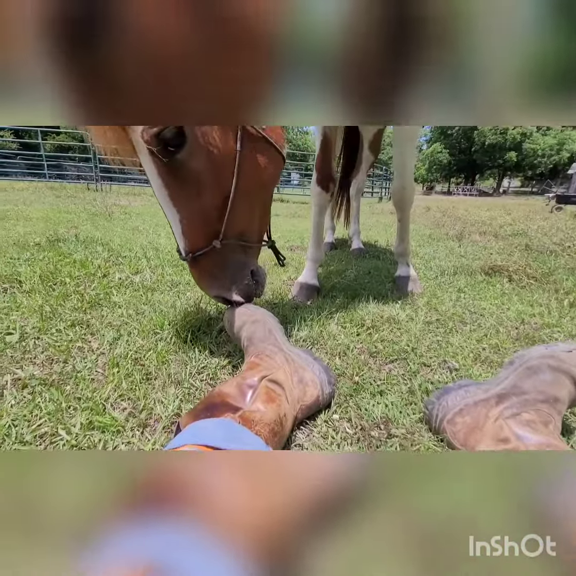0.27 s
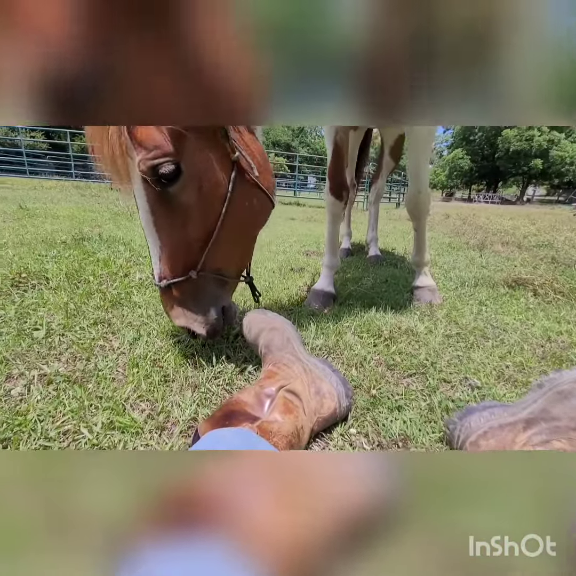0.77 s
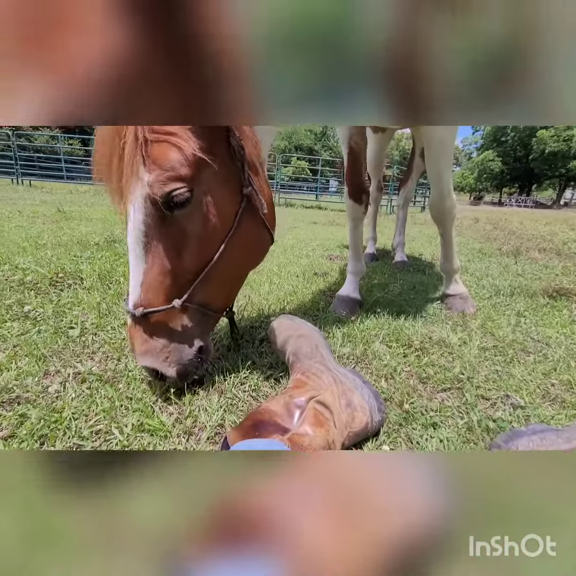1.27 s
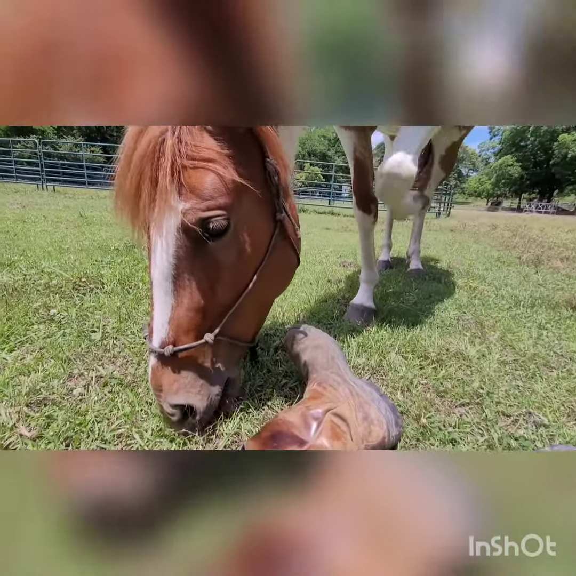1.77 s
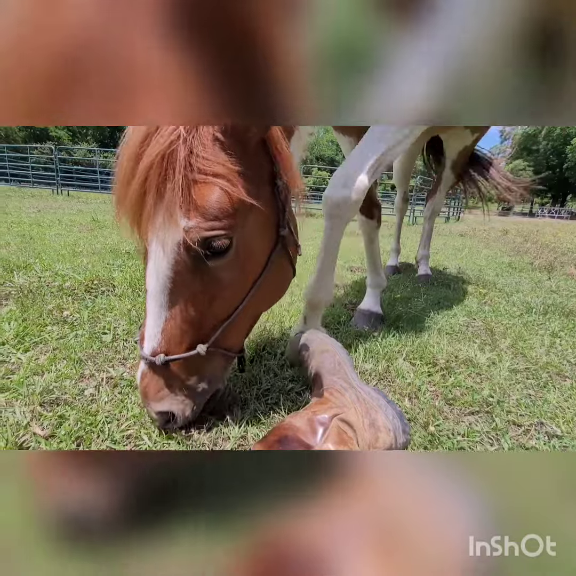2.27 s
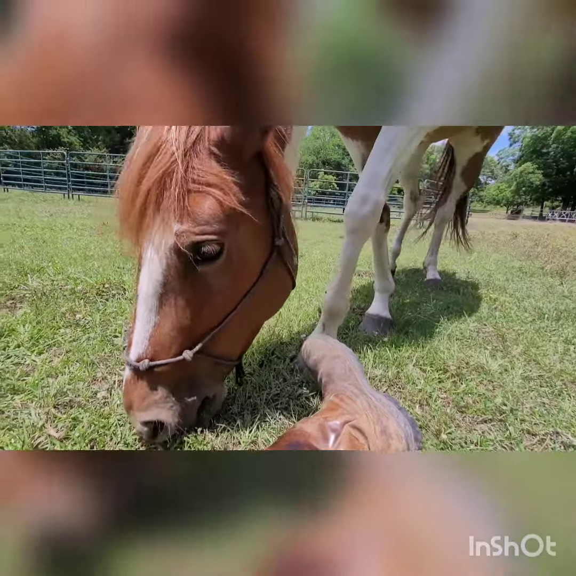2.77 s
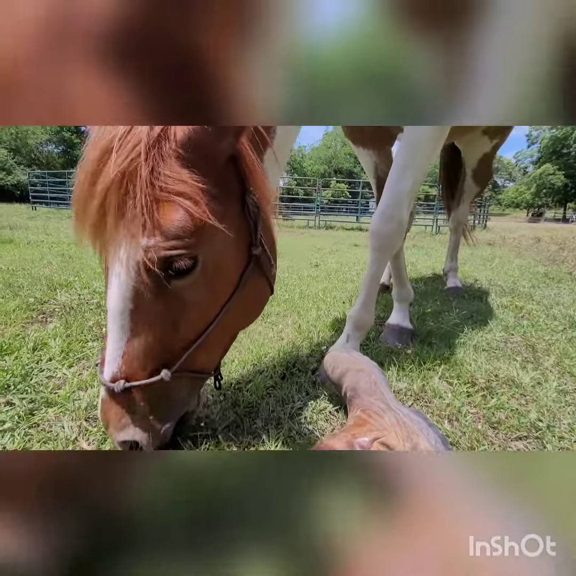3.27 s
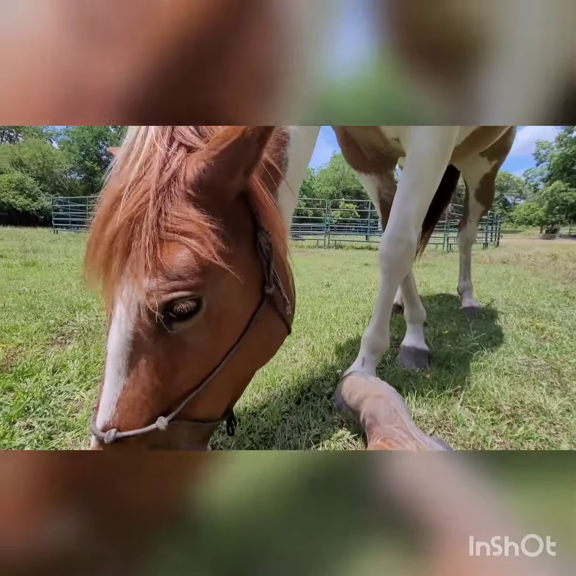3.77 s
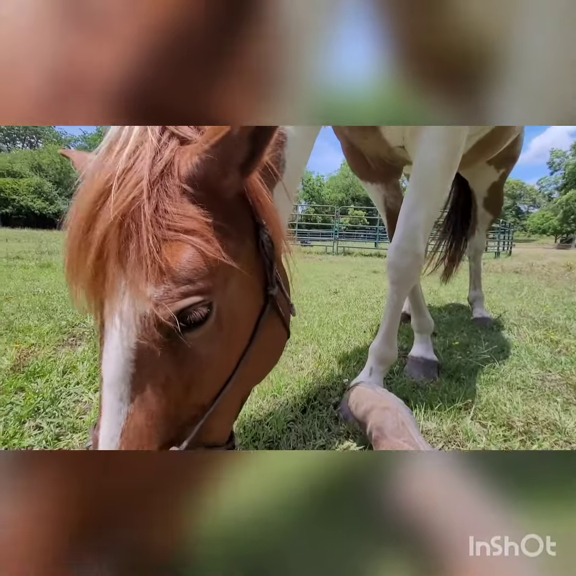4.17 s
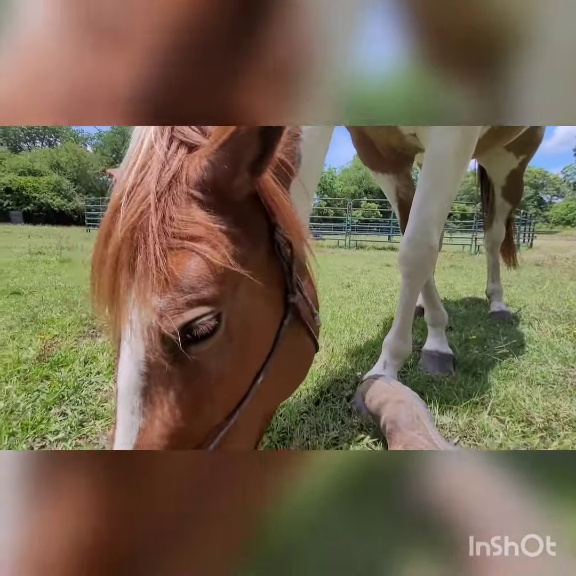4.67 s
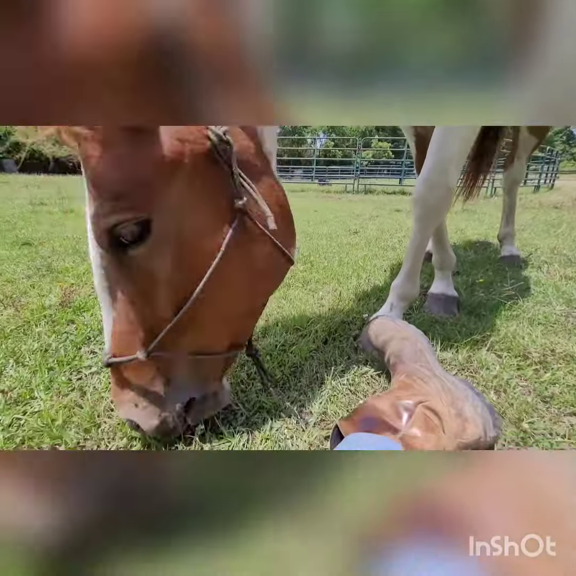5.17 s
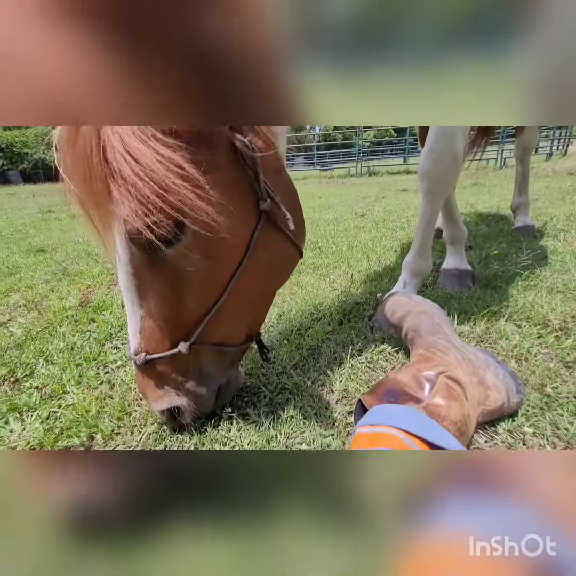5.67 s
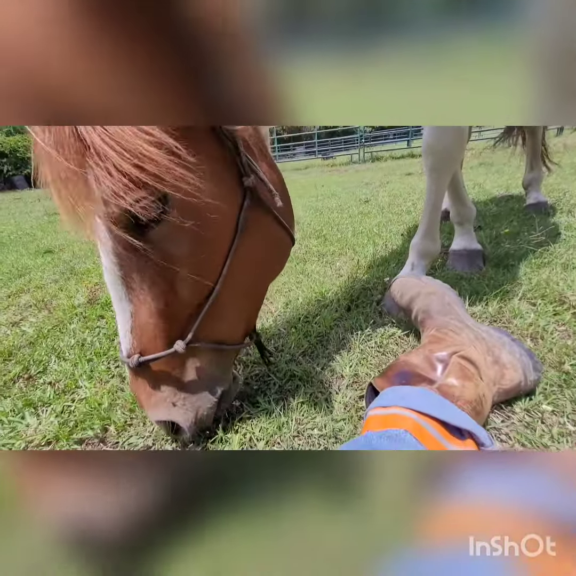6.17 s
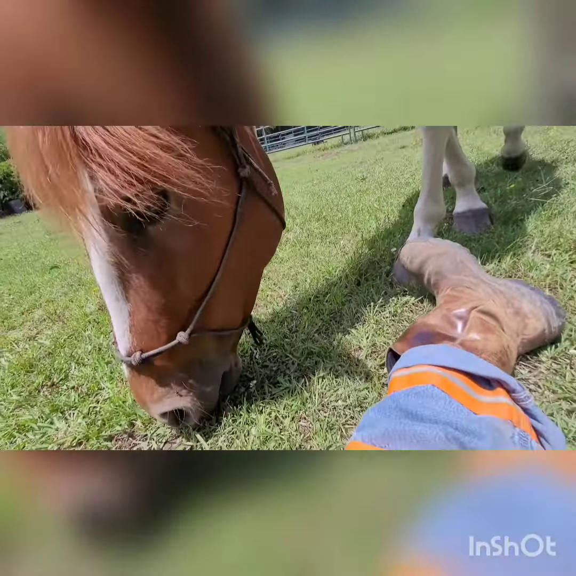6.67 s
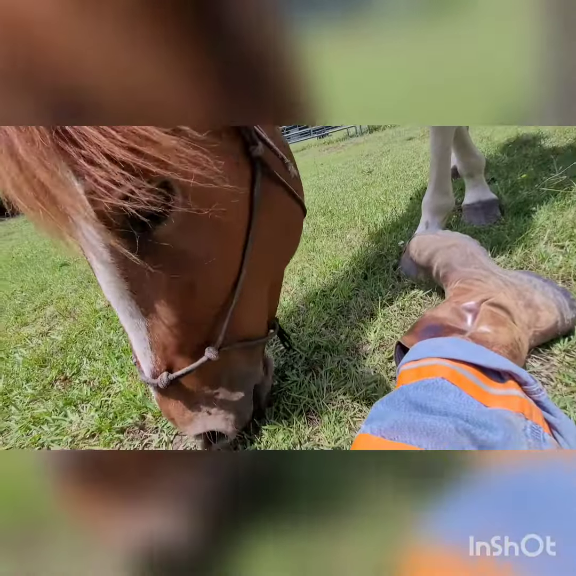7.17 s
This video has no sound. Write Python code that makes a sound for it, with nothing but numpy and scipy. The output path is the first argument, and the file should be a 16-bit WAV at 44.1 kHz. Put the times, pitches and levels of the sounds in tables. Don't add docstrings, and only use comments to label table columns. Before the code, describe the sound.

A stereo microphone lies in open grass beside a horse's mouth. A distant machine hums near 200 Hz throughout, in slow overlapping swells strongest in the first two seconds, with low lumpy wind and faint leaf and insect hiss. At 0.4 s comes a soft nostril sniff and two quick upward chirps; another short sniff at 1.3. Light brushing and chewing begin, with dull tooth knocks from 1.6. At 2.1-2.3 grass rips sharply and a hoof lands with a deep thud. A longer crackling pull comes at 3.0, then a quiet gap, a sniff at 3.7 and gentle chewing. Crunchy tears follow at 4.05 and 4.75, then a soft rip at 5.3 with wet pops. A loud crunch with lip squeaks hits at 6.0, bird chirps at 6.2, more chewing, and a bright, full rip at 6.9 before wet munching to the end near 7.4.

```python
import sys
import numpy as np
from scipy import signal
from scipy.fft import rfft, irfft
from scipy.io import wavfile
from scipy.ndimage import uniform_filter1d

SR = 44100
rng = np.random.default_rng(int(sys.argv[2]) if len(sys.argv) > 2 else 0)


def field_ratio(decibels):
    return 10 ** (np.asarray(decibels, dtype=float) / 20)


def generate_wav(signal):
    frames = np.transpose(np.atleast_2d(signal))
    scaled = np.clip(frames, -1, 1) * 32767
    pcm = np.round(scaled).astype(np.int16)
    wavfile.write(sys.argv[1], SR, pcm)


N = 327699


def evened(x):
    return x / np.sqrt(np.mean(x ** 2) + 1e-20)


def read(points, hz):
    f, value = np.transpose(points)
    return np.interp(np.log(hz + 1), np.log(f + 1), value)


def curve(rows, order):
    columns = np.transpose(rows)
    return np.interp(np.arange(N) / SR, columns[0], columns[order])


def add(mix, s, sound):
    part = mix[..., round(s * SR):][..., :sound.shape[-1]]
    part += sound[..., :part.shape[-1]]


# f/Hz, likeness (0 to 1)
LIKENESS = [(60, .88), (180, .93), (550, .85), (1650, .6), (5000, .1), (15000, .02)]


def heard(two, colour, size=512, patchy_db=0, wide=1):
    hz, _, (a, b) = signal.stft(two, SR, nperseg=size)
    same = np.clip(read(LIKENESS, hz), 0, 1)[:, None] ** wide
    ports = np.array([a, same * a + np.sqrt(1 - same ** 2) * b])
    patches = rng.standard_normal(a.shape)
    patches = uniform_filter1d(patches, size=size // 50, axis=0)
    patches = uniform_filter1d(patches, size=3000 // size + 1, axis=1)
    ports *= field_ratio(read(colour, hz)[:, None] + patchy_db * evened(patches))
    return evened(signal.istft(ports, SR, nperseg=size)[1][:, :N])


def grains(per_s, spread_db, bed):
    size = field_ratio(spread_db * np.minimum(rng.exponential(1, N), 4))
    size = size * (rng.random(N) < per_s / SR)
    fade_s = .0005
    size = signal.lfilter([1], [1, -np.exp(-1 / (fade_s * SR))], size)
    return (evened(size) + bed) * rng.standard_normal((2, N))


def flutter(hz, depth_db):
    drift = signal.sosfilt(signal.butter(2, hz, fs=SR, output="sos"), rng.standard_normal(N))
    return field_ratio(depth_db * evened(drift))


def ring(hz, t60, rise):
    t = np.arange(round(t60 * SR) + 40) / SR
    swing = -np.sin(2 * np.pi * hz * t) * field_ratio(-60 * t / t60) * (1 - np.exp(-t / rise))
    return swing / abs(swing).max()


def whistles(rows, rough):
    out = np.zeros(N)
    for s, length, from_hz, to_hz, db in rows:
        u = np.linspace(0, 1, round(length * SR))
        hz = to_hz + (from_hz - to_hz) * (1 - u) ** 2
        tone = np.sin(2 * np.pi * np.cumsum(hz) / SR)
        add(out, s, field_ratio(db) * tone * np.sin(np.pi * u))
    shiver = evened(uniform_filter1d(rng.standard_normal(N), size=70))
    return out * (1 + rough * shiver)


# t/s, level/dB
WIND = [(0.0, -67.5), (0.68, -61.5), (1.01, -66), (1.26, -65.5), (1.51, -62.5), (2.19, -61.5), (2.69, -67),
        (2.98, -62), (3.1, -66.5), (3.35, -66), (3.95, -62.5), (4.14, -66), (4.39, -67), (5.34, -63),
        (5.79, -69.5), (6.6, -66.5), (7.06, -62.5), (7.43, -60)]
# f/Hz, level/dB (per Hz)
GUST = [(20, -34), (35, -4.5), (55, 0), (90, -4), (170, -2), (260, -6), (420, -25), (700, -38.5)]
# f/Hz, level/dB (per Hz)
AIR = [(180, -12), (300, -8), (349, -5), (558, -9.5), (970, -18), (1330, -24.5), (1960, -13.5),
       (2980, -29.5), (3770, -11), (6670, -13.5), (8580, -19.5), (9650, -26), (10500, -25), (15200, -32),
       (16500, -11.5)]


def outdoors():
    wind = heard(rng.standard_normal((2, N)), GUST, size=4096, wide=3) * flutter(hz=9.2, depth_db=2.5)
    air = heard(rng.standard_normal((2, N)), AIR, size=1024, patchy_db=.7) * flutter(hz=2, depth_db=.5)
    return wind * field_ratio(curve(WIND, order=1) + 5.0) + air * field_ratio(-70.5)


# t/s of the peak, length/s, level/dB
SWELLS = [(0.04, 0.69, -51.5), (0.568, 0.7, -45.5), (0.987, 1, -53), (1.329, 0.41, -46.5), (1.702, 1, -48),
          (2.32, 0.91, -55.5), (2.66, 0.67, -52.5), (3.025, 0.43, -54.5), (3.4, 0.43, -51),
          (3.805, 0.59, -50.5), (4.52, 0.77, -54), (5.19, 0.99, -58.5), (5.483, 0.82, -52.5),
          (6.127, 0.57, -55.5), (6.67, 0.98, -52.5), (7.256, 0.87, -55)]


def swells():
    t, power = np.arange(N) / SR, field_ratio(-82) ** 2
    for s, length, db in SWELLS:
        hump = np.cos(np.pi * np.clip((t - s) / length, -.5, .5)) ** 2
        power = power + (field_ratio(db) * hump) ** 2
    return np.sqrt(power)


# t/s, f/Hz
HUM_HZ = [(0, 203), (2, 203.7), (3, 198.9), (4.5, 195), (6, 198.8), (7.43, 195.6)]


def hum():
    turns = 2 * np.pi * np.cumsum(curve(HUM_HZ, order=1)) / SR
    tone = np.sqrt(2) * (np.sin(turns) + field_ratio(-29.5) * np.sin(2 * turns))
    return tone * swells() * flutter(hz=22, depth_db=-0.13)


# t/s, length/s, start f/Hz, end f/Hz, level/dB
CHIRPS = [
    (.372, .03, 4880, 7250, -64),
    (.528, 0.03, 4900, 7220, -60),
    (.84, 0.1, 7600, 8400, -77),
    (.96, .07, 2400, 2000, -78),
    (1., .1, 8100, 8600, -79),
    (6.225, 0.042, 6500, 7860, -59),
    (6.31, 0.042, 5830, 7740, -61),
]


def bird():
    direct, t = whistles(CHIRPS, rough=1), np.arange(SR // 3) / SR
    echoes = rng.standard_normal((2, len(t))) * field_ratio(-60 * t / .4)
    echoes = echoes / np.linalg.norm(echoes[0])
    return direct / 2 + signal.fftconvolve(direct[None], echoes, axes=1)[:, :N]


# t/s, level/dB (peak), f/Hz, t60/s
THUDS = [
    (0.171, -49.5, 57, 0.23),
    (0.74, -46.5, 54, 0.19),
    (1.293, -45, 51, 0.43),
    (1.974, -40, 43, 0.14),
    (2.279, -21.5, 68, 0.077),
    (3.099, -51, 60.4, .12),
    (3.57, -51, 55, 0.14),
    (4.82, -53, 60, 0.1),
    (6.02, -45.5, 55, .14),
    (7.147, -44.5, 58, 0.2),
]


def hooves():
    turf = np.zeros((2, N))
    sides_db = rng.choice([-.3, .3], len(THUDS))
    for (s, db, hz, t60), side_db in zip(THUDS, sides_db):
        add(turf, s, field_ratio([[db - side_db], [db + side_db]]) * ring(hz, max(t60, .02), rise=0.0017))
    return turf


# t/s, length/s, level/dB
SNIFFS = [
    (0.401, 0.45, -55.5),
    (1.27, 0.19, -57),
    (3.713, 0.33, -56.5),
]
# f/Hz, level/dB (per Hz)
NOSTRIL = [(140, -53), (230, 1.5), (579, -9), (783, -11.5), (1160, -21), (1740, -21), (3600, -27),
           (6820, -28.5), (8450, -34.5), (16000, -25)]


def sniffs():
    level = np.zeros(N)
    for s, length, db in SNIFFS:
        add(level, s, field_ratio(db) * np.hanning(round(length * SR)) ** 0.92)
    breath = heard(rng.standard_normal((2, N)), NOSTRIL, patchy_db=-2.5)
    return level * flutter(hz=40, depth_db=1.0) * breath


# t/s, level/dB (peak), f/Hz of the jaw, level/dB of the cheek
KNOCKS = [(1.595, -43, 205, -47.5), (1.719, -55, 197, -59), (1.83, -39, 149, -56),
          (1.91, -38.5, 225, -40.5), (2.073, -41.5, 178, -56), (2.276, -31, 142, -53),
          (2.599, -38.5, 234, -40.5), (2.914, -42, 177, -63), (3.681, -40.5, 201, -43),
          (3.761, -37, 207, -56), (3.907, -40, 205, -67), (3.979, -38.5, 140, -65), (4.178, -40, 129, -71),
          (4.426, -38.5, 196, -65), (4.495, -38.5, 230, -38.5), (4.719, -40.5, 130, -73),
          (5.043, -39, 153, -56), (5.192, -41.5, 149, -62), (5.208, -45, 150, -66),
          (5.668, -42.5, 280, -45.5), (5.733, -42, 250, -46), (5.949, -36, 170, -56),
          (6.033, -30, 339, -42), (6.077, -29.5, 316, -37), (6.613, -39, 214, -46), (6.854, -31, 197, -60),
          (6.943, -36, 247, -43), (7.334, -31, 277, -38)]


def knocks():
    jaw, lag_s = np.zeros(N), .003
    for s, db, hz, cheek_db in KNOCKS:
        add(jaw, s + lag_s, field_ratio(db) * ring(hz, t60=6.8 / hz, rise=0.0012))
        add(jaw, s + lag_s, field_ratio(cheek_db - 4.5) * ring(hz=610, t60=0.03, rise=0.0015))
    return jaw


# t/s, length/s, start f/Hz, end f/Hz, level/dB
SQUEAKS = [
    (1.72, 0.025, 2230, 1970, -65),
    (5.13, 0.019, 1270, 735, -53.5),
    (5.535, 0.021, 810, 1020, -57),
    (6.095, 0.023, 2630, 2070, -51),
    (6.11, .012, 2000, 2860, -49.5),
    (1.815, .035, 2250, 2190, -66),
    (1.88, 0.046, 2740, 2650, -69),
    (7.172, 0.0205, 1070, 1860, -57),
    (7.258, 0.021, 1760, 698, -54.5),
]


def squeaks():
    return whistles(SQUEAKS, rough=0.76)


# t/s, level/dB, f/Hz
POPS = [(5.0908, -50.5, 1100), (5.431, -43, 1200), (5.432, -47, 2170), (5.554, -44, 1140),
        (5.785, -43, 980), (5.795, -46, 1110), (5.523, -56, 3200), (6.321, -56, 1110), (6.332, -59, 2600),
        (6.446, -56, 1060), (6.478, -52.5, 950), (6.604, -51, 1170), (6.616, -52, 1190), (6.856, -53, 1700),
        (7.087, -60, 2700), (7.171, -46, 1010), (7.259, -49, 1580), (7.271, -52, 1010), (7.366, -49, 900),
        (7.375, -44, 880), (2.796, -57, 1170), (3.133, -58, 1350)]


def pops():
    out = np.zeros(N)
    for s, db, hz in POPS:
        add(out, s, field_ratio(db) * ring(hz, t60=.012, rise=.0008))
    return out


# t/s, level/dB of brushing
NUZZLE = [
    (1.1, -83.5),
    (1.45, -67),
    (2.9, -63),
    (3.2, -71.5),
    (3.6, -66),
    (5.0, -63.5),
    (5.75, -63.5),
    (6.15, -62),
    (6.55, -62),
    (7.43, -62),
]
# t/s, time to lose 15 dB/s, level/dB of brushing, level/dB of grinding
JERKS = [
    (2.165, 0.03, -57, -47),
    (2.273, 0.0356, -43, -51),
    (2.996, 0.17, -60.5, -54),
    (4.05, 0.18, -54.5, -53.5),
    (4.787, 0.22, -53.5, -50.5),
    (5.953, 0.1, -59, -56),
    (6.037, 0.17, -53.5, -52.5),
    (6.922, 0.3, -61, -56),
    (6.954, -0.01, -56.5, -47),
]
# t/s, length/s, level/dB of brushing, level/dB of grinding
CHEWS = [(1.319, 0.14, -69, -59.5), (1.549, 0.074, -55, -70), (1.692, 0.089, -62, -70),
         (1.794, 0.088, -53.5, -62), (1.908, 0.22, -61, -62.5), (2.181, 0.15, -53, -58),
         (2.39, 0.18, -61.5, -74), (2.545, 0.12, -56.5, -61.5), (2.706, 0.13, -65, -62.5),
         (3.623, 0.12, -57, -60.5), (3.767, 0.2, -68, -54.5), (3.93, 0.092, -57.5, -57),
         (4.106, .11, -56, -80), (4.383, 0.098, -57, -58.5), (4.498, 0.083, -62.5, -58.5),
         (5.093, 0.12, -60, -63), (5.4, 0.1, -56, -62), (5.507, .1, -57.5, -60), (5.625, 0.077, -46.5, -56),
         (5.76, 0.099, -59.5, -61), (5.91, 0.093, -81, -81), (6.094, 0.13, -75, -81),
         (6.416, 0.1, -60.5, -65.5), (6.582, 0.079, -51, -60), (6.635, 0.16, -59, -60),
         (6.782, 0.093, -57.5, -63), (7.121, 0.029, -53, -63), (7.176, 0.18, -64, -62.5),
         (7.368, 0.074, -56, -59)]
# t/s, length/s, level/dB of fizz, level/dB of crunch
TEARS = [
    (2.134, 0.045, -43.5, -49),
    (2.971, .12, -49, -49),
    (3.229, .2, -62.5, -75.5),
    (4.035, 0.031, -64, -49),
    (4.265, 0.086, -82, -66),
    (4.743, 0.083, -46.5, -50.5),
    (4.91, 0.067, -67, -81),
    (5.288, 0.18, -54.5, -59),
    (6.027, 0.068, -56, -42.5),
    (6.898, 0.11, -44, -43.5),
]


def effort_db(order):
    t = np.arange(N) / SR
    rest_db = curve(NUZZLE, order=1) - 5.5 * (order - 1)
    power = field_ratio(rest_db) ** 2 * (t > NUZZLE[0][0])
    near = t[:SR // 2] - .25
    for s, fall, *db in JERKS:
        rise = .13 * fall
        drop_db = 15 * np.maximum(near / fall, -near / rise)
        add(power, s - .25, field_ratio(db[order - 1] + 2 - drop_db) ** 2)
    lean_in, let_go, swell_db = 0.34, 0.19, -5
    for s, length, *db in CHEWS:
        u = np.linspace(0, 1, round(length * SR))
        ramps = np.minimum(1, np.minimum(u / lean_in, (1 - u) / let_go))
        add(power, s, (field_ratio(db[order - 1] + swell_db * (u - .5)) * ramps) ** 2)
    for s, length, *db in TEARS:
        add(power, s, field_ratio(db[order - 1]) ** 2 * signal.windows.tukey(round(length * SR), .25) ** 2)
    return 10 * np.log10(power + 1e-12)


# f/Hz, level/dB (per Hz)
BRUSH = [(1500, -14), (2500, -5.5), (4200, -8.5), (7200, -5), (8800, -8.5), (11500, 0), (15000, 1.5),
         (15900, 4), (16150, -23)]
# f/Hz, level/dB (per Hz)
GRIND = [(160, -36.5), (280, 15), (327, -10.5), (541, -3.5), (623, -9), (1080, -5.5), (2500, -9.5),
         (3700, -13), (8000, -21), (10400, -87), (17600, -120)]
# t/s, level/dB of the finest fizz
FACING = [(1.5, 0), (3.2, -3), (5.3, -1), (6.3, -4), (7.4, 0.5)]


def grazing():
    brush_db, grind_db = effort_db(order=1), effort_db(order=2)
    smooth = np.clip(field_ratio(-(grind_db + 50) / 2), .8, 6)
    brush = grains(per_s=640, spread_db=-2.5, bed=2.7 * smooth) * flutter(hz=39.6, depth_db=2.0)
    grind = grains(per_s=600, spread_db=1, bed=1.1 * smooth) * flutter(hz=30, depth_db=2)
    brush = heard(brush / np.hypot(1, smooth), BRUSH, size=256, patchy_db=1.3)
    fine = signal.sosfiltfilt(signal.butter(4, 10000, "high", fs=SR, output="sos"), brush)
    brush = brush + (field_ratio(curve(FACING, order=1)) - 1) * fine
    grind = heard(grind / np.hypot(1, smooth), GRIND, size=512, patchy_db=1.0, wide=1.0)
    muffled = signal.sosfilt(signal.butter(2, 1900, fs=SR, output="sos"), grind)
    shut = np.clip((smooth - 1.2) / 1.57, 0, .9)
    chewing = (1 - shut) * grind + shut * muffled
    return brush * field_ratio(brush_db) + chewing * field_ratio(grind_db)


# t/s, level/dB of the ring, f/Hz of the mouth, level/dB of the bright burst
STEMS = [(2.1177, -58, 590, -36), (2.1495, -35, 1460, -52), (2.164, -26, 790, -49),
         (2.1729, -31.5, 650, -32.5), (2.274, -31, 520, -33), (2.9791, -30, 1020, -31),
         (2.9998, -26, 604, -27), (3.0102, -24.5, 980, -28), (3.0565, -36, 510, -36),
         (3.0812, -34.5, 910, -38.5), (4.0564, -26, 1060, -38), (4.0937, -26, 1150, -34),
         (4.7244, -44, 1370, -35), (4.7557, -30, 1270, -51), (4.7685, -37, 1110, -27),
         (4.7961, -34, 760, -26), (4.8084, -30, 1540, -33), (5.9498, -33.5, 1380, -31.5),
         (5.985, -38, 1420, -37), (6.0135, -30, 1330, -32), (6.035, -16.5, 1530, -30),
         (6.0612, -30, 1240, -43), (6.0784, -22.5, 1320, -27.5), (6.9032, -40, 1380, -29),
         (6.921, -51, 2650, -21), (6.932, -30, 2390, -34), (6.9464, -27.5, 2650, -32),
         (6.9545, -27, 676, -17), (6.9743, -21.5, 1290, -22), (7.1353, -52, 3510, -37.5)]
# t/s, level/dB of the ring, f/Hz of the mouth
CLICKS = [(2.1576, -26, 1360), (2.2204, -33.5, 1440), (2.234, -39, 1180), (2.9375, -39, 1450),
          (2.9482, -41, 1580), (3.6871, -40, 940), (4.0124, -41, 584), (4.046, -37, 1130),
          (4.1124, -34.5, 1670), (4.1829, -30, 1080), (4.5557, -40.5, 2700), (4.886, -46, 1300),
          (5.4327, -41, 1220), (5.556, -46, 1140), (5.796, -45, 1050), (7.031, -32.5, 1350),
          (7.1907, -39.5, 1220), (7.3383, -55, 474), (1.716, -50, 750), (1.8327, -45, 780),
          (2.1445, -42, 2390), (2.2144, -48, 3060), (2.6015, -48, 680), (3.04, -46, 2800),
          (3.6821, -49, 1720), (3.817, -41, 1010), (3.8706, -46, 1120), (4.0199, -40, 690),
          (4.0732, -40, 1680), (6.0323, -34, 1100)]
# t/s, level/dB of the ring, f/Hz of the mouth, level/dB of the burst
FIBRES = [(2.1684, -30, 1420, -50), (2.1811, -33, 1450, -46), (2.9723, -45, 1270, -45),
          (2.9853, -29, 1250, -48), (2.9948, -28, 1340, -37), (3.0237, -31, 780, -46),
          (3.0335, -41, 1250, -53), (3.0378, -46, 1440, -45), (3.053, -42, 780, -46),
          (3.0636, -37, 1530, -48), (4.0305, -37, 1120, -38.5), (4.0396, -38, 1550, -58),
          (4.049, -36, 1080, -48), (4.0527, -39, 1160, -45), (4.0608, -37, 1060, -47),
          (4.07, -34, 1380, -54), (4.0777, -40, 750, -44), (4.082, -37, 1460, -50), (4.4997, -47, 670, -67),
          (4.747, -38, 1100, -56), (4.7794, -36, 1210, -45), (4.786, -42, 1270, -40),
          (4.7918, -40, 950, -45), (4.805, -35, 600, -39), (4.8133, -41, 2200, -53),
          (4.828, -44, 2300, -53), (4.832, -41, 2110, -54), (4.8403, -39, 1960, -56),
          (4.8473, -46, 950, -55), (4.872, -50, 1420, -56), (5.956, -48, 620, -57), (6.017, -42, 1340, -48),
          (6.0384, -37, 1060, -48), (6.0437, -41, 1060, -51), (6.056, -32, 1120, -40),
          (6.071, -38, 1440, -51), (6.086, -27.5, 2740, -42), (6.0897, -41, 2480, -43),
          (6.105, -37, 1230, -61), (6.6104, -40, 1140, -49), (6.9003, -43, 2280, -45),
          (6.9246, -37, 1140, -39), (6.928, -28, 2580, -37), (6.94, -43, 2540, -46), (6.95, -31, 1920, -43),
          (6.9586, -37, 710, -45), (6.98, -30, 710, -34), (7.0014, -47, 1550, -53),
          (7.0108, -43, 2370, -38.5), (7.1764, -43, 1030, -67)]


def stems():
    crushed = [(s, db, hz, db - 11) for s, db, hz in CLICKS]
    fibres = [(s, db, hz, burst_db + 3) for s, db, hz, burst_db in FIBRES]
    return STEMS + crushed + fibres


def snaps():
    out, t, rows = np.zeros((2, N)), np.arange(500) / SR, stems()
    burst = (1 - np.exp(-t / .0002)) * np.exp(-t / .0009)
    spray = rng.standard_normal((len(rows), 3, len(t) + 1))
    lags = .00012 * rng.uniform(-1, 1, len(rows))
    for (s, db, hz, tick_db), (left, right, both), lag in zip(rows, spray, lags):
        crumbs = signal.lfilter([1], [1, -2 * .9 * np.cos(2 * np.pi * hz / SR), .9 ** 2], both[1:])
        mouth = field_ratio(db - 1.5) * ring(hz, t60=4 / hz, rise=.0001)
        tooth_gap = field_ratio((db + tick_db) / 2 - 1.0) * ring(hz=2630, t60=0.0019, rise=.0001)
        crumble = field_ratio(db - 3.5) * evened(crumbs) * burst
        first_fibre = field_ratio(tick_db + 1.5) * ring(hz=7500, t60=.0003, rise=.00002)
        for port, at in zip(out, (s, s + lag)):
            for sound in (mouth, tooth_gap, crumble, first_fibre):
                add(port, at, sound)
        bright = np.array([left[1:] - .5 * left[:-1], right[1:] - .5 * right[:-1]])
        add(out, s - .0003, field_ratio(min(tick_db, -27) + 6) * bright * burst)
    return signal.sosfilt(signal.butter(1, 445, "high", fs=SR, output="sos"), out)


def scene():
    paddock = outdoors() + hum() + bird()
    horse = hooves() + sniffs() + knocks() + squeaks() + pops() + grazing() + snaps()
    return paddock + horse


def roll_off(x):
    return signal.sosfilt(signal.butter(12, 16400, fs=SR, output="sos"), x)


# f/Hz, level/dB (left minus right)
LEAN = [(60, 0), (300, .3), (1200, 1.5), (4000, .4), (9000, -3.5), (14000, -1.2)]


def record(dry):
    hz = np.fft.rfftfreq(N, 1 / SR) + 1
    lean = field_ratio(np.outer([.5, -.5], read(LEAN, hz)))
    band = 1 / np.sqrt((1 + (41 / hz) ** 6) * (1 + (hz / 15900) ** 120))
    mix = irfft(rfft(dry) * lean * band, N)
    return roll_off(mix)


dry = scene()
out = record(dry)
generate_wav(out)
```